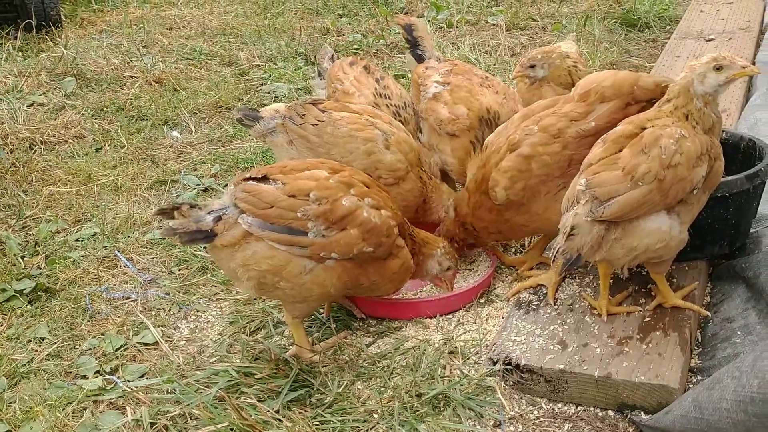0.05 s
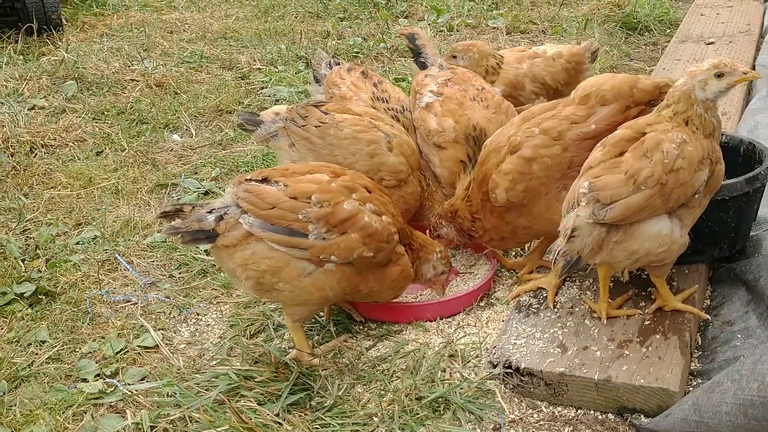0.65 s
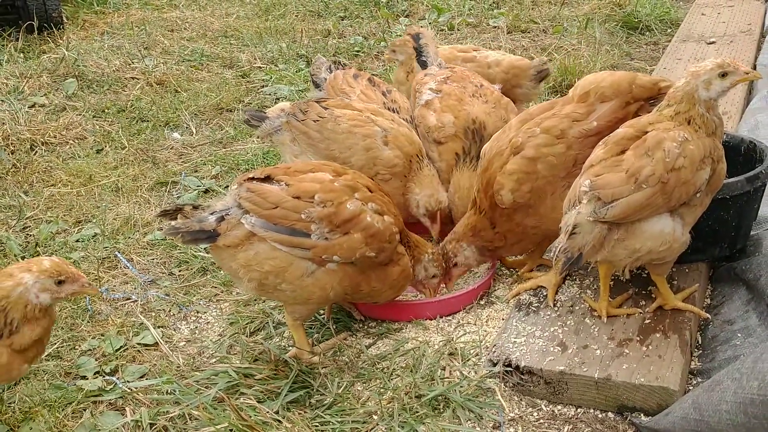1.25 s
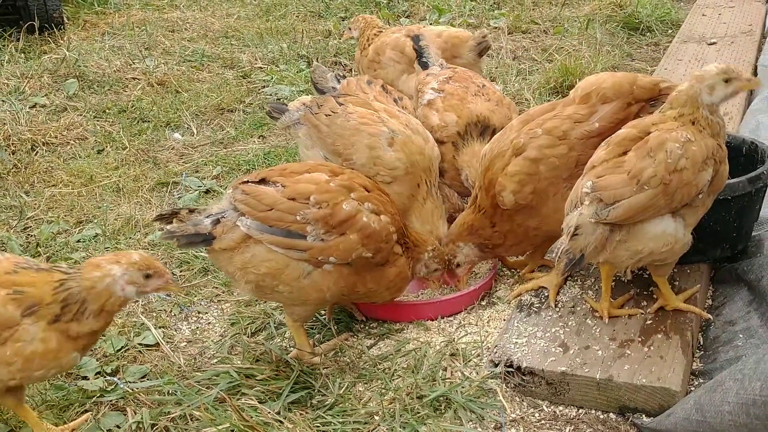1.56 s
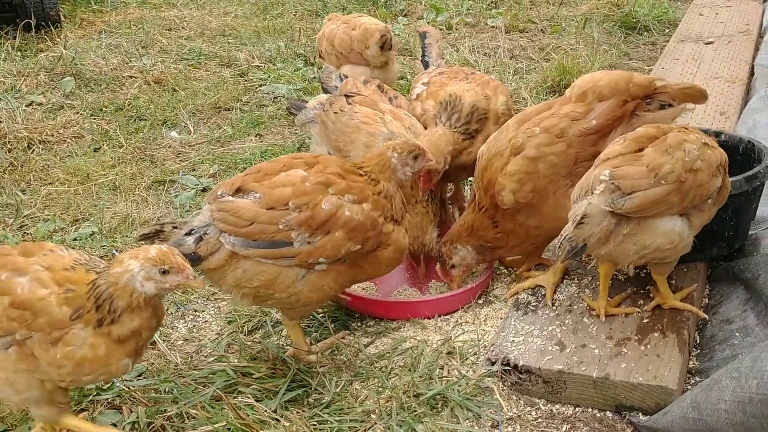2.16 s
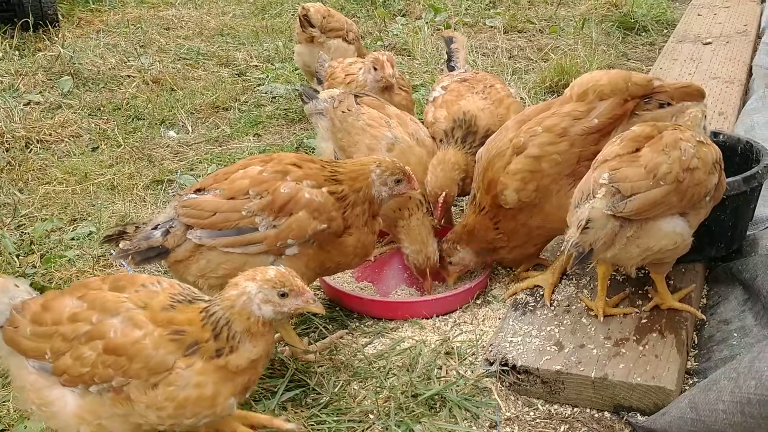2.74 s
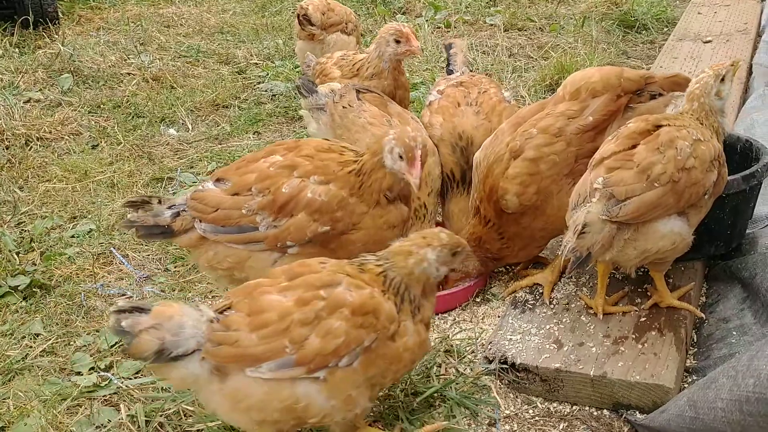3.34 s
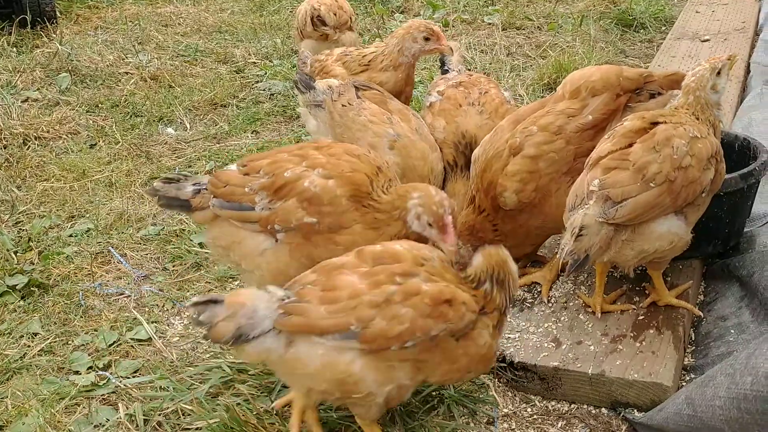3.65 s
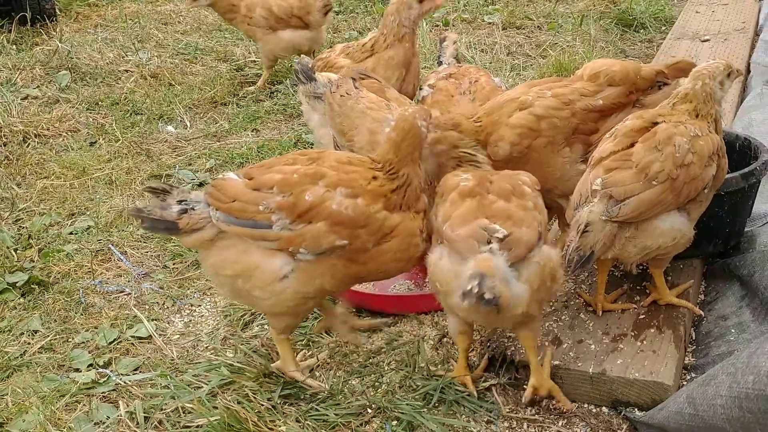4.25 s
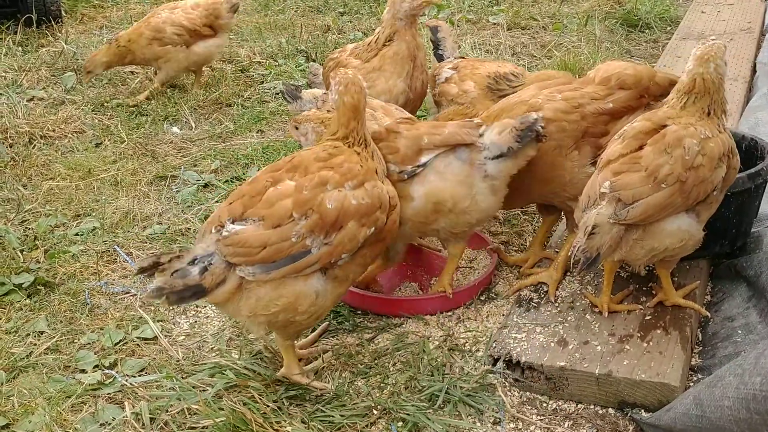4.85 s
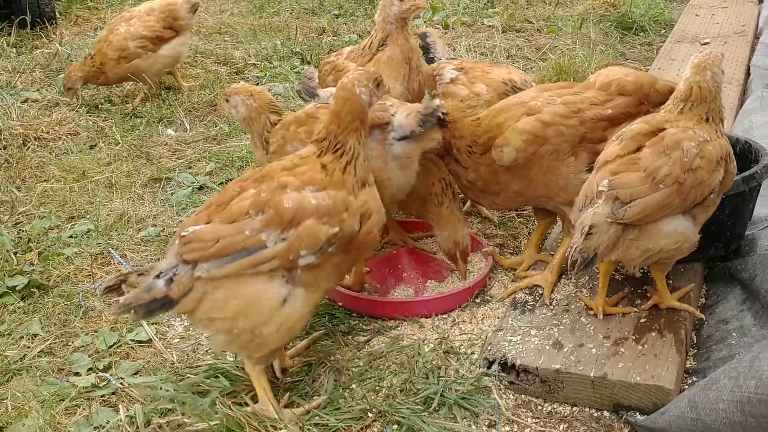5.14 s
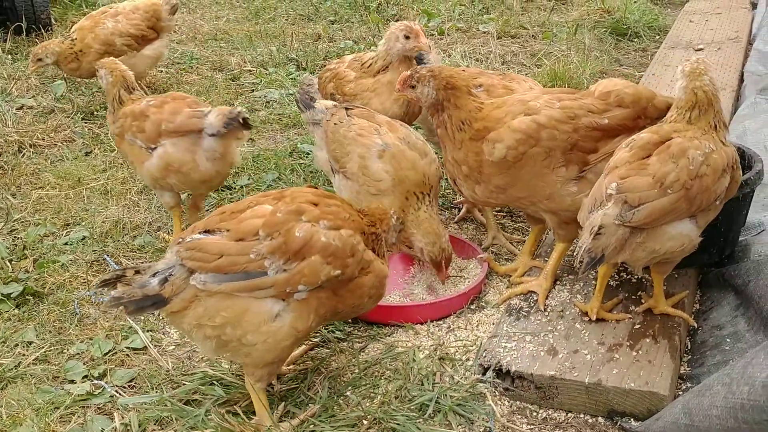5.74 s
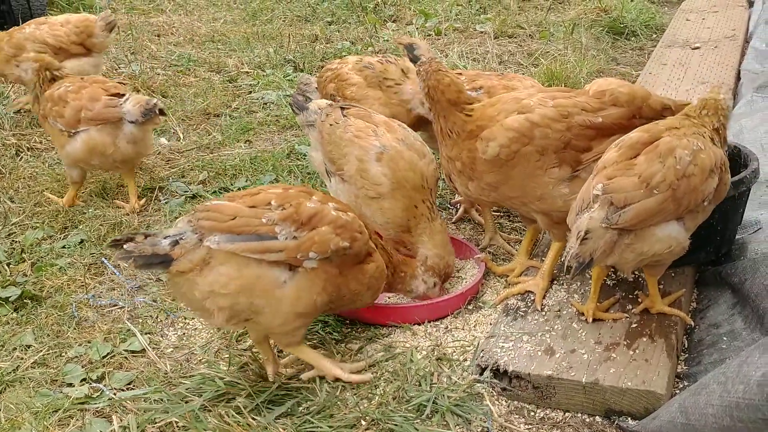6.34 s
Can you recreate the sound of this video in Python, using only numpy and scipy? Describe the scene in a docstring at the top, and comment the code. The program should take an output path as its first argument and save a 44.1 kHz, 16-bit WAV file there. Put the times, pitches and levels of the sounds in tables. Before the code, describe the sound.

Young chickens feed from a plastic pan on a lawn, about a metre from the microphone. Throughout, beaks make short, dull, irregular taps on the pan, mixed with tiny crisp cracks of grain and soft, high, falling peeps. Feathers and feet rustle lightly in the grass over a low outdoor hiss and a faint, distant hum.

Short, sharp pips stand out at about 1.2 and 2.7 seconds, with firmer taps around 1.7, 2 and 3.1 seconds. At about 3.6 and 3.8 seconds a jostled bird gives two brief, shrill, raspy trills. The rustling and scuffing grow a little, and a quick run of sharp pips follows from 4 to 4.8 seconds, the last two being the loudest sounds. After that the birds return to soft peeps and pecking, with the strongest knock on the pan near 5.8 seconds and a couple more taps around 6.4 seconds.

```python
"""Young chickens at a feed pan

Birds crowd round a plastic pan on a lawn, a metre from the microphone. Beaks excite the pan's damped
modes and fracture grain; feet and feathers rustle in the grass. Each voice is a nearly pure whistle
of the syrinx, gliding in pitch to make soft peeps, sharp pips and, as one bird pushes in, two shrill
trills. Behind it all lie outdoor hiss and a faint far hum."""
import sys
import numpy as np
from scipy import signal
from scipy.fft import rfft, irfft
from scipy.io import wavfile
from scipy.ndimage import uniform_filter1d

SR = 44100
rng = np.random.default_rng(int(sys.argv[2]) if len(sys.argv) > 2 else 0)


def unload_wav(signal):
    """Save mono or channel-first audio to the path in sys.argv[1] as 16-bit WAV at rate SR, clipped to [-1, 1]."""
    wavfile.write(
        sys.argv[1],
        SR,
        np.round(np.clip(np.atleast_2d(signal).T, -1, 1) * 32767).astype(np.int16),
    )


N = 290619
TIME = np.arange(N) / SR
BIN_HZ = np.fft.rfftfreq(N, 1 / SR)

# Noise spectra of the air, feathers and feet. Each row: frequency in Hz, relative density in dB.
AIR_SPECTRUM = [(15, -21.5), (25, -46.5), (43, 0.5), (123, 6), (190, -3), (714, -9.5), (1160, -13),
                (2110, -20), (3430, -18.5), (4370, -19.5), (5430, -20.5), (10700, -21), (11600, -15),
                (12900, -20.5), (16000, -18)]
RUSTLE_SPECTRUM = [(900, -42), (1800, 0), (3300, 8), (4400, 3.5), (5600, 5), (8000, 7.5), (11500, 6.5),
                   (13000, 11), (16000, 5)]
SCUFF_SPECTRUM = [(120, -7.5), (280, 3), (600, 0.5), (1200, -3.5), (2000, -13), (4000, -36)]
# Likeness of the noise in the two channels. Each row: frequency in Hz, likeness from 0 to 1.
COHERENCE = [(60, 0.027), (380, 0), (640, 0.88), (1410, 0.8), (2150, 0), (5600, 0.38), (6820, 0),
             (11000, 0.077)]
# Envelope of the far hum. Each row: time in seconds, relative level in dB.
HUM_LEVELS = [(0.0, -71), (1.74, -77.5), (2.42, -65.5), (6.59, -71)]
# How much the flock shifts about. Each row: time in seconds, relative level of its rustle in dB.
STIR_LEVELS = [(0.0, -66.5), (1.27, -69), (1.59, -66), (2.24, -70), (2.57, -65.5), (2.77, -65), (3.19, -64),
               (3.36, -68.5), (3.61, -64.5), (3.74, -61), (4.15, -61), (4.59, -64), (4.88, -65),
               (5.25, -62), (5.56, -64.5), (6.35, -65.5), (6.5, -68), (6.59, -70)]
# Wing brushes and foot scrapes. Each row: middle and length in seconds, feather and scuff levels in dB.
STROKES = [(1.434, 0.07, -54, -66), (1.52, 0.052, -56.5, -78), (1.772, 0.06, -52, -52),
           (2.855, 0.043, -51.5, -83), (3.036, 0.03, -84, -54.5), (3.964, 0.025, -51, -73),
           (4.12, 0.033, -50, -70), (4.287, 0.084, -56, -57.5), (4.481, 0.021, -52.5, -50),
           (4.937, 0.032, -58, -55), (4.971, 0.032, -56.5, -52), (5.115, 0.038, -51, -78),
           (5.185, 0.024, -51.5, -71), (5.851, 0.054, -50.5, -79)]
# Beak impacts on the pan. Each row: start in seconds, level in dB, nominal main mode in Hz,
# hardness (gain of the upper modes) in dB, left-right balance in dB.
BEAK_KNOCKS = [(0.137, -45.5, 452, -5.5, 2), (0.231, -48.5, 424, -3, 0), (0.568, -39, 677, -8, -0.5),
               (0.917, -45, 437, 3.5, 3), (1.403, -39.5, 443, -17, 1), (1.433, -48, 490, 0.5, 1),
               (1.656, -47, 414, -8, 2), (1.734, -34, 550, -7.5, 0), (1.743, -36.5, 540, -5, -7),
               (1.973, -31.5, 563, -17, 0), (2.002, -41.5, 485, -12, 2), (2.632, -48, 316, 5, -2),
               (3.023, -49, 670, -9, 14), (3.149, -33, 540, -2.5, 0.5), (4.064, -46, 454, -10, 14),
               (4.07, -39.5, 500, -14, -2), (4.077, -37, 513, -9, 4), (4.421, -37, 542, -23, 0),
               (4.428, -37.5, 420, -16, 2.5), (4.467, -41.5, 650, -12, 0.5), (4.527, -38, 293, -17, 0.5),
               (4.611, -47, 580, -5, 3), (4.928, -48, 600, -9, -1), (4.969, -44, 683, -11, -2),
               (5.453, -37.5, 460, -8.5, 4.5), (5.746, -34.5, 400, -11, 2.5), (5.7636, -24, 504, -10, 1.5),
               (6.383, -42.5, 436, 1.5, 4.5), (6.389, -38.5, 533, -3, 0)]
# Pan modes, damped by the feed. Each row: nominal frequency in Hz, relative level in dB,
# time to decay by 60 dB in seconds.
PAN_LOW_MODES = [(498, 2.5, 0.022), (705, -4.5, 0.016), (328, -16.5, 0.061)]
PAN_HIGH_MODES = [(1375, 1, 0.013), (1363, -13.5, 0.041), (1870, -6.5, 0.0066), (2470, -18.5, 0.028),
                  (3150, -51.5, 0.011)]
# Grain and husks breaking. Each row: start in seconds, level in dB, gain of the husk's low crunch in dB,
# decay time in seconds, left-right balance in dB.
GRAIN_CRACKS = [(0.137, -52, -3, 0.0025, 3), (0.23, -52.5, 4, 0.0062, -1), (0.517, -53, -2, 0.0024, 2),
                (0.726, -55, -3, 0.0018, -3), (1.419, -53, 2.5, .006, 1), (1.661, -57, 19, 0.00082, 6),
                (1.667, -48.5, 15, 0.0023, 2), (1.748, -37.5, -2.5, 0.00094, 0),
                (1.765, -52.5, 8.5, .005, 2), (1.975, -48, 5, 0.0046, 1), (1.999, -45, 7, 0.0055, 0.5),
                (2.299, -43.5, -6.5, 0.00056, -1), (2.51, -40, -1, 0.0011, -2.5),
                (2.5838, -34.5, 4, 0.0018, 2), (2.629, -55, 10, .004, 2), (3.902, -46.5, -1, 0.0021, 0),
                (3.946, -45, -4, .0018, 2), (4.064, -44.5, -2.5, 0.0024, 0), (4.076, -44.5, -3, .0019, 1),
                (4.259, -45.5, -0.5, .002, 2), (4.419, -43.5, 0.5, 0.0016, 1), (4.469, -52, 2, .014, 1),
                (4.612, -49.5, 4.5, .003, -2), (5.356, -47, 0.5, 0.0038, 1), (5.454, -49.5, 5, 0.003, -1),
                (5.7626, -49, 10, 0.0048, -3.5), (5.854, -38.5, -9, 0.0015, -3.5),
                (6.38, -45.5, 2.5, 0.0058, -1)]
# Soft peeps. Each row: start and length in seconds, fraction of the length before the crest,
# crest and final pitch in Hz, level in dB, left-right balance in dB.
PEEP_CALLS = [(0.362, 0.066, 0.22, 4870, 3390, -56, 5), (0.399, 0.098, .05, 3900, 2640, -65, 1),
              (0.657, 0.065, 0.32, 4400, 3110, -66.5, 3), (0.715, 0.067, 0.13, 3300, 1960, -60, -1),
              (1.056, 0.087, 0.27, 4550, 2840, -60.5, 1), (1.15, .045, 0.16, 3100, 2480, -67, 3),
              (1.768, 0.04, 0.14, 3360, 2860, -56, -3), (2.006, .05, 0.02, 3500, 2950, -64, -3),
              (2.362, 0.056, 0.2, 3650, 2560, -60.5, -2), (2.428, 0.082, 0.02, 3620, 2400, -51.5, -5),
              (2.825, 0.057, 0.15, 3140, 2350, -59.5, -1), (3.082, 0.058, .08, 3600, 2150, -58, 0),
              (3.237, 0.059, 0.27, 3820, 2190, -53.5, 0.5), (4.162, .05, .02, 2710, 2470, -62, -8),
              (5.251, 0.08, 0, 4220, 2660, -56.5, -1), (5.552, 0.061, 0.28, 3080, 2740, -55, -3),
              (5.598, 0.024, 0.66, 4040, 3300, -53.5, 0), (5.776, 0.066, .02, 3350, 2920, -59, 2),
              (6.025, 0.051, 0, 3750, 2240, -52.5, 0), (6.052, 0.06, 0.15, 3890, 2870, -57, 2)]
# Spectrum of the voice. The entries are the relative levels of harmonics 1 to 5 in dB.
HARMONIC_LEVELS = [-2, -24, -36.5, -34.5, -48]
# Pips, each a high arch dropping to a low note. Each row: time of the drop in seconds; the arch's
# length in seconds, top in Hz and level in dB; the note's pitch in Hz, length in seconds and level in dB;
# left-right balance in dB; lag of the left channel in seconds.
PIP_CALLS = [(0.895, 0.012, 2625, -58, 1452, 0.029, -44.5, -9, .00003),
             (1.229, 0.017, 2570, -51.5, 1278, 0.026, -28.5, -0.5, 0.000043),
             (2.653, 0.017, 3050, -50, 1330, 0.016, -28.5, -1.5, .00004),
             (3.9593, 0.011, 3550, -43, 1587, 0.0029, -25.5, -9, .00003),
             (3.977, 0.016, 3306, -34, 1247, 0.012, -24.5, -0.5, .00002),
             (4.106, 0.025, 4190, -45.5, 1497, 0.0027, -24, -1, .0001),
             (4.116, 0.011, 3216, -37.5, 1520, .003, -60, -4, 0.000065),
             (4.351, .023, 3900, -41.5, 1430, 0.0053, -30, -1, .00025),
             (4.362, 0.0074, 2200, -37, 1287, 0.006, -38, -3, .00005),
             (4.5613, .026, 3750, -37, 1364, 0.0062, -14, -2.5, 0.000061),
             (4.771, 0.025, 3550, -42, 1507, 0.0068, -16, -5.5, 0.00025)]
# Shrill trills. Each row: start, attack and hold in seconds, base pitch in Hz, level in dB.
TRILL_CALLS = [(3.555, 0.01153, 0.087, 3258, -32.5), (3.7613, .018, 0.042, 3130, -36.5)]


def amp(db):
    """Amplitude ratio of a level in decibels."""
    return 10 ** (np.asarray(db) / 20)


def unit(x):
    """Normalisation to an rms of 1."""
    return x / np.sqrt(np.mean(x ** 2) + 1e-20)


def peaked(x):
    """Normalisation of the loudest two milliseconds to an rms of 1."""
    return x / np.sqrt(uniform_filter1d(x ** 2, 88).max() + 1e-20)


def per_bin(points):
    """Interpolation of a spectrum along a logarithmic frequency axis."""
    hz, value = np.transpose(points)
    return np.interp(np.log(BIN_HZ + 1), np.log(hz + 1), value)


def band(x, lo_hz, hi_hz, order=2):
    """Butterworth band-pass filtering."""
    edges = [lo_hz, min(hi_hz, SR / 2 - 100)]
    return signal.sosfilt(signal.butter(order, edges, "band", fs=SR, output="sos"), x)


def drift(size, rate_hz):
    """Random fluctuation: low-passed noise with an rms of 1."""
    hz = np.fft.rfftfreq(size, 1 / SR)
    return unit(irfft(rfft(rng.standard_normal(size)) * np.exp(-(hz / rate_hz) ** 2), size))


def add(mix, start, sound, side_db, lag_s=0):
    """Level and time differences between the channels place a sound to one side."""
    for channel, heard, side in zip(mix, np.broadcast_to(sound, (2, sound.shape[-1])), (.5, -.5)):
        part = channel[max(round((start + side * lag_s) * SR), 0):][:len(heard)]
        part += amp(side * side_db) * heard[:len(part)]


def coloured(pair, spectrum):
    """Partial coherence: two independent noises mix as sum and difference under one spectrum."""
    a, b = rfft(pair)
    coherence = np.clip(0.98 * per_bin(COHERENCE), 0, 1)
    mid, side = np.sqrt(1 + coherence) * a, np.sqrt(1 - coherence) * b
    return unit(irfft(np.array([mid + side, mid - side]) * amp(per_bin(spectrum)), N))


def outdoor_air(level_db=-58, swell_db=1.8):
    """Broadband noise under slow amplitude modulation gives outdoor hiss and rumble."""
    swell = amp(level_db + swell_db * drift(N, 7.9))
    air = swell * coloured(rng.standard_normal((2, N)), AIR_SPECTRUM)
    return band(air, 91, SR / 2, order=1)


def far_hum(hz=124, waver=0.041, gain_db=5):
    """Random frequency and amplitude modulation make a distant tone waver."""
    phase = 2 * np.pi * np.cumsum(hz * (1 + waver * drift(N, 5.83))) / SR
    hum = np.array([np.sin(phase + offset) * (1 + 0.64 * drift(N, 3.3)) for offset in (0, 1.4)])
    return amp(gain_db + np.interp(TIME, *np.transpose(HUM_LEVELS))) * hum


def stirring(rustle_db=5, scuff_db=1, still_db=-70, clicks_per_s=900):
    """Friction noise: feathers and dry grass crackle and feet scuff, their motions adding in power."""
    stir_db = np.interp(TIME, *np.transpose(STIR_LEVELS))
    excess_power = np.maximum(amp(2 * stir_db) - amp(2 * still_db), 0)  # above the still lawn
    middle, length, wing_db, foot_db = np.transpose(STROKES)
    strokes = np.exp(-(2 * (TIME - middle[:, None]) / length[:, None]) ** 2)
    out = np.zeros((2, N))
    layers = [(rustle_db, wing_db, RUSTLE_SPECTRUM), (scuff_db, foot_db, SCUFF_SPECTRUM)]
    for gain_db, stroke_db, spectrum in layers:
        power = amp(2 * gain_db) * excess_power + amp(2 * stroke_db) @ strokes
        motion = np.sqrt(power) * amp(1.3 * drift(N, 30))
        clicks = (rng.random((2, N)) < clicks_per_s / SR) * rng.standard_normal((2, N))
        clicks *= amp(3 * np.minimum(rng.exponential(1, (2, N)), 4))  # a few stand out
        out += motion * coloured(unit(clicks) + 1.16 * rng.standard_normal((2, N)), spectrum)
    return out


def nibbles(per_s=2.5, spread_db=4):
    """Light pecks fall at random. Each row: start in seconds, level offset and balance in dB."""
    moment, strength, side = rng.random((round(per_s * N / SR), 3)).T
    return np.transpose([moment * N / SR, spread_db * (2 * strength - 1), 4 * (2 * side - 1)])


def ring(modes, tune, t):
    """Free vibration: damped modes of alternating sign, a little different for each spot struck."""
    return sum((-1) ** k * amp(db - 60 * t / t60)
               * np.sin(2 * np.pi * hz * tune * rng.uniform(0.92, 1.04) * t)
               for k, (hz, db, t60) in enumerate(modes))


def knocks(pecks, contact_s=0.00096, peck_db=-56.5, peck_hz=480, peck_hard_db=-4):
    """Impact excitation: a beak drives the pan through the feed; a clean hit rings the upper modes too."""
    out, t = np.zeros((2, N)), np.arange(3000) / SR
    light = [(start, peck_db + db, peck_hz, peck_hard_db, side_db) for start, db, side_db in pecks]
    for start, db, hz, hard_db, side_db in BEAK_KNOCKS + light:
        onset = 1 - np.exp(-t / contact_s)
        low = peaked(ring(PAN_LOW_MODES, hz / PAN_LOW_MODES[0][0], t) * onset)
        high = peaked(ring(PAN_HIGH_MODES, rng.uniform(0.905, 1.128), t))
        add(out, start, amp(db) * (low + amp(hard_db - 1) * high), side_db)
    return band(out, 200, 6000)  # the knocks carry no deep bass


def cracks(pecks, crumb_db=-57.5, crumb_s=0.0021, grit=0.64, width=0.76, lag_s=0.00024):
    """Brittle fracture: a grain breaks in a quick cluster of tiny cracks, an uneven burst of noise."""
    out, t = np.zeros((2, N)), np.arange(2500) / SR
    crumbs = [(start, crumb_db + db, 0, crumb_s, side_db) for start, db, side_db in pecks]
    for start, db, crunch_db, decay, side_db in GRAIN_CRACKS + crumbs:
        burst = np.exp(-t / decay + grit * drift(len(t), 1300)) * (1 - np.exp(-t / 0.00023))
        snap = burst * (rng.standard_normal(len(t)) + width * rng.standard_normal((2, len(t))))
        husk = amp(crunch_db - 1) * peaked(band(snap, 2000, 4200))
        edge = amp(-0.5) * peaked(band(snap, 5000, 9000))
        fizz_db = np.log2(0.003 / decay)  # 1 dB more for each halving of the decay time
        fizz = amp(fizz_db) * peaked(band(snap, 9500, 16000))
        add(out, start, amp(db) * (husk + edge + fizz), side_db, lag_s * rng.uniform(-0.85, 1))
    return out


def syrinx(hz, db, jitter, shimmer, overtone_db, rough_hz, subharmonic_db=-60):
    """Flow-driven oscillation: unsteady air shakes a nearly pure tone; strain adds half-pitch lines."""
    size = len(hz)
    phase = 2 * np.pi * np.cumsum(hz * (1 + jitter * drift(size, rough_hz))) / SR
    tone = sum(amp(level + overtone_db * (k > 1)) * np.sin(k * phase) * (k * hz < SR / 2)
               for k, level in enumerate(HARMONIC_LEVELS, 1))
    tone *= 1 + 2 * amp(subharmonic_db) * np.cos(phase / 2)
    tone *= 1 + shimmer * drift(size, rough_hz)
    from_end_s = np.minimum(np.arange(size), np.arange(size)[::-1]) / SR
    return amp(db) * tone * np.minimum(from_end_s / 0.00067, 1)


def peeps(crest_width=0.32, lag_s=0.000076):
    """Frequency glide: the pitch of a contented peep crests, falls quickly and levels out."""
    out = np.zeros((2, N))
    for start, length, crest, top_hz, last_hz, db, side_db in PEEP_CALLS:
        progress = np.linspace(0, 1, int(length * SR))
        height = 1 / (1 + ((progress - crest) / crest_width) ** 2)
        hz = last_hz + (top_hz - last_hz) * (height - height[-1]) / (1 - height[-1])
        call = syrinx(hz, db + height - 0.5, jitter=0.018, shimmer=0.27, overtone_db=-5, rough_hz=397)
        call *= signal.windows.tukey(len(call), 0.3)
        add(out, start, call, side_db, lag_s * rng.uniform(-0.42, 1))
    return out


def pips(sag_hz_per_s=4700, edge_s=0.0016, rasp_db=-14):
    """Change of register: a hoarse high arch drops to a short low note, usually the louder of the two."""
    out = np.zeros((2, N))
    for drop_s, arch_s, top_hz, arch_db, low_hz, note_s, note_db, side_db, lag_s in PIP_CALLS:
        t = np.arange(-arch_s, note_s + edge_s, 1 / SR)  # zero at the drop
        arch = abs(np.sin(np.pi * np.clip(-t / arch_s, 0, 1)))
        note = abs(np.sin(np.pi * np.clip((t + edge_s) / (note_s + 2 * edge_s), 0, 1)))
        hz = low_hz + (top_hz - low_hz) * arch ** 0.7 - sag_hz_per_s * np.maximum(t, 0)
        swell = amp(arch_db) * arch + amp(note_db) * note ** 0.94
        breath = unit(band(rng.standard_normal(len(t)), 1180, 2900, order=3))
        rasp = breath * amp(rasp_db) * (hz / 3000) ** 2
        voice = syrinx(hz, 0, jitter=0.021, shimmer=0.11, overtone_db=-2, rough_hz=530)
        add(out, drop_s - arch_s, swell * (voice + rasp), side_db, lag_s)
    return out


def trills(warbles_per_s=52, depth=0.42, sag_hz_per_s=3200, leap_hz=700, leap_s=0.016):
    """Frequency modulation: a jostled bird's pitch warbles as it sags, and its rasp grows with effort."""
    rise_db, fade_db_per_s, fade_s = 21, 360, 0.065
    out = np.zeros((2, N))
    for start, attack_s, hold_s, base_hz, level_db in TRILL_CALLS:
        t = np.arange(0, attack_s + hold_s + fade_s, 1 / SR)
        effort_db = -rise_db * np.maximum(1 - t / attack_s, 0)
        effort_db -= fade_db_per_s * np.maximum(t - attack_s - hold_s, 0)
        db = level_db + effort_db
        centre_hz = base_hz - sag_hz_per_s * t + leap_hz * np.exp(-(t / leap_s) ** 2)
        warble = abs(np.sin(np.pi * warbles_per_s * t)) - 2 / np.pi  # arches of zero mean
        # the voice is slightly softer and steadier at the top of each arch
        voice = syrinx(centre_hz * (1 + depth * warble), db - warble, jitter=0.035 * (1 - 2 * warble),
                       shimmer=0.4, overtone_db=1, rough_hz=900, subharmonic_db=-17)
        breath = rng.standard_normal(len(t))
        rasp = amp(-11) * unit(band(breath, 1560, 3250, order=4))
        wheeze = amp(-22) * unit(band(breath, 7400, 8500))
        call = voice + amp(db + 0.5 * effort_db) * (rasp + wheeze)
        add(out, start, band(call, 1400, 14000, order=4), side_db=-2, lag_s=0.00004)
    return out


def yard(x, near_db, far_db, wall_db=-24, near_s=0.0049, far_s=0.019, wall_s=0.032):
    """Reflection: quick scatter from ground and boards, a thin outdoor tail and one echo from a wall."""
    t = np.arange(SR // 4) / SR
    taps = rng.choice([-1., 1.], (2, 2, len(t))) * (rng.random((2, 2, len(t))) < 3000 / SR)
    near = taps[0] * np.exp(-t / near_s) * (t > 0.001)
    far = taps[1] * np.exp(-t / far_s) * (t > 0.012)
    echo = (amp(near_db) * unit(near) + amp(far_db) * unit(far)) / np.sqrt(len(t))
    echo[:, round(wall_s * SR)] += amp(wall_db)
    return x + signal.oaconvolve(x, echo, axes=1)[:, :N]


def scene():
    """Superposition of pecking, voices and the sounds of the lawn."""
    pecks = nibbles()
    pan = yard(knocks(pecks), near_db=-9, far_db=-17)
    grain = yard(cracks(pecks), near_db=-3.5, far_db=-12.5)
    calls = pips()
    beamed = band(calls, 2730, 4100)  # high notes radiate away from the microphone and return as echo
    low_notes = yard(calls - beamed, near_db=-14, far_db=-23)
    high_notes = yard(beamed, near_db=-1, far_db=-9.5)
    protest = yard(trills(), near_db=-8, far_db=-14)
    flock = yard(peeps(), near_db=-3, far_db=-7)
    voices = low_notes + high_notes + protest + flock
    return pan + grain + voices + stirring() + outdoor_air() + far_hum()


def record(dry):
    """Frequency response: the microphone's ports notch the treble, and a low-pass limits the band."""
    # Each row: centre in Hz, width in Hz, gain in dB.
    dips = [(2130, 160, -3.5), (4415, 374, -7.5), (11800, 570, -8.5), (14150, 670, -5.5)]
    response_db = sum(db * np.exp(-((BIN_HZ - centre) / width) ** 2) for centre, width, db in dips)
    heard = irfft(rfft(dry) * amp(response_db), N)
    low_pass = signal.firwin(511, cutoff=15950, window=("kaiser", 9), fs=SR)
    return signal.oaconvolve(heard, low_pass[None], "same")


dry = scene()
out = record(dry)
unload_wav(out)
```